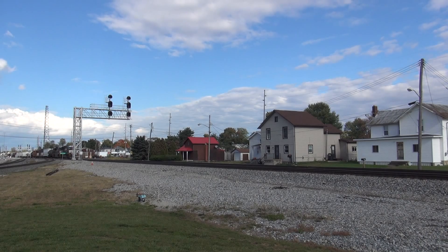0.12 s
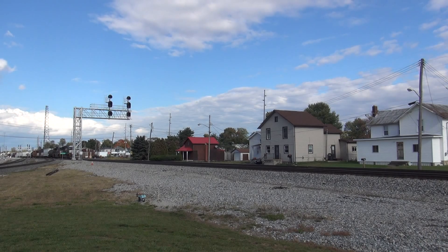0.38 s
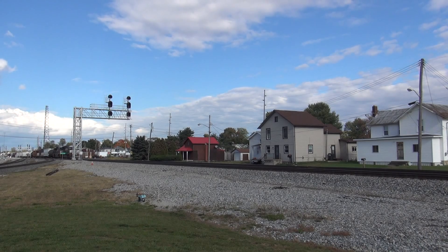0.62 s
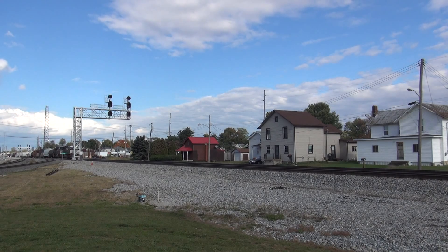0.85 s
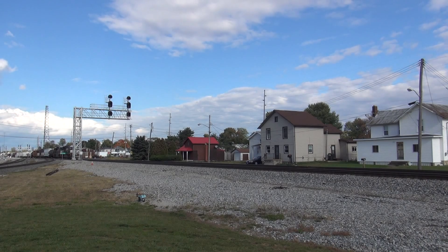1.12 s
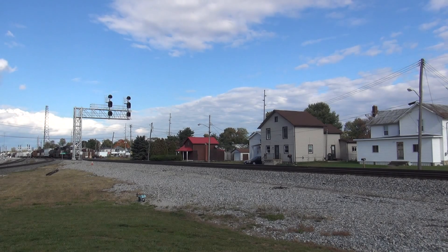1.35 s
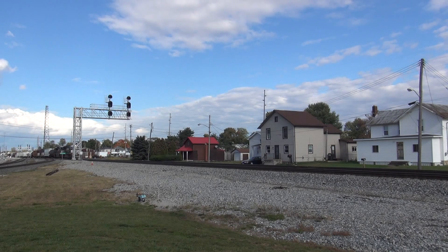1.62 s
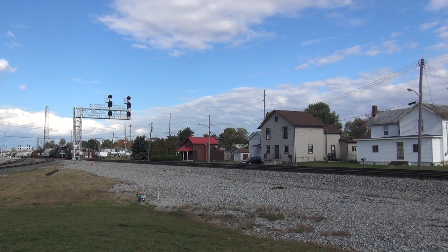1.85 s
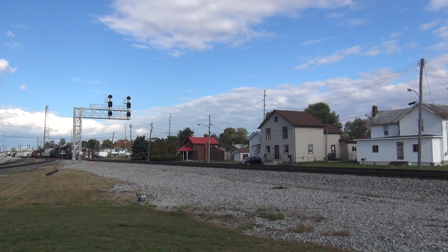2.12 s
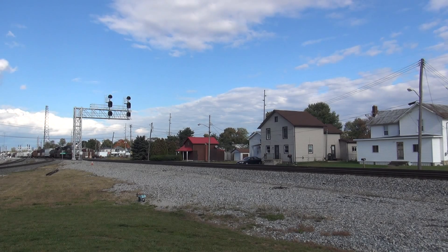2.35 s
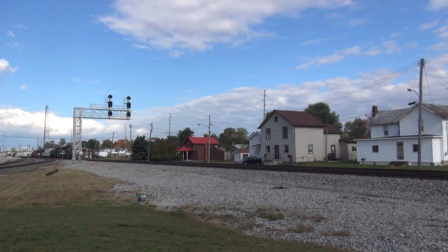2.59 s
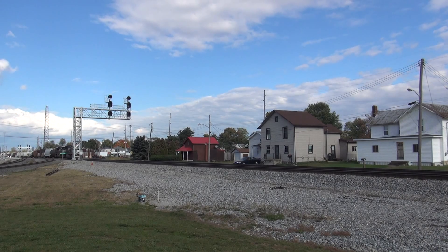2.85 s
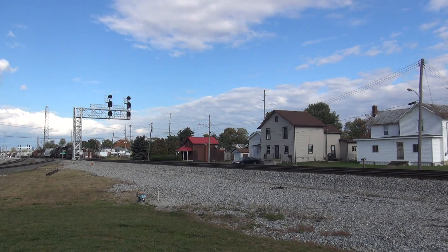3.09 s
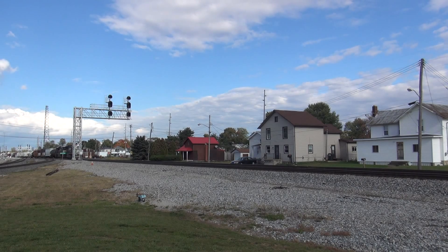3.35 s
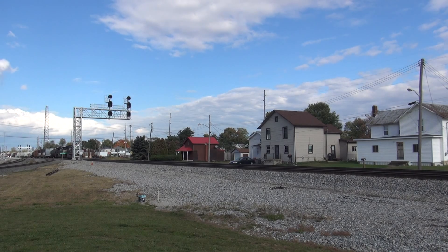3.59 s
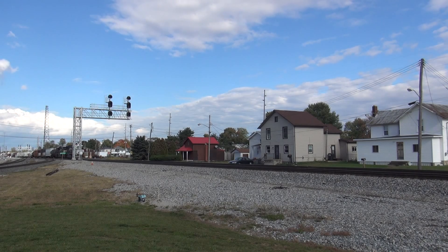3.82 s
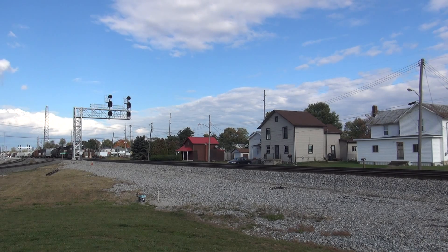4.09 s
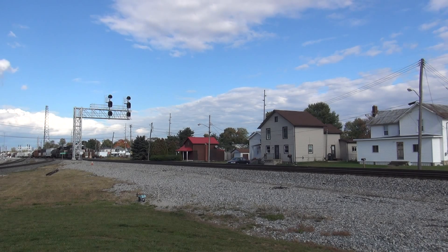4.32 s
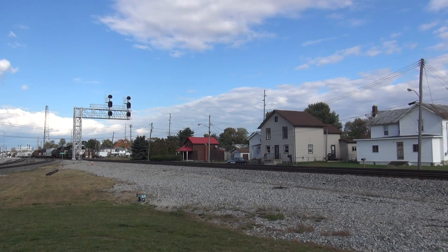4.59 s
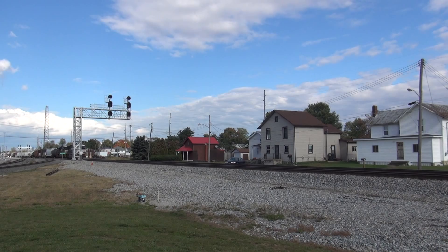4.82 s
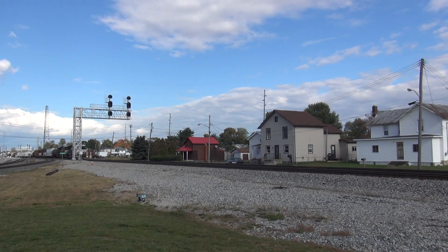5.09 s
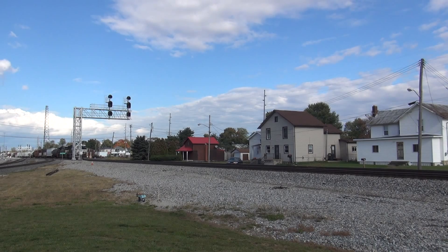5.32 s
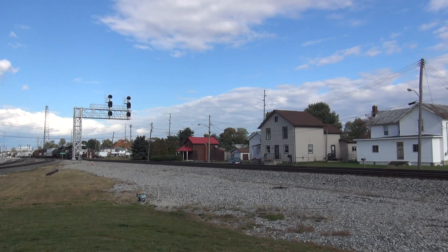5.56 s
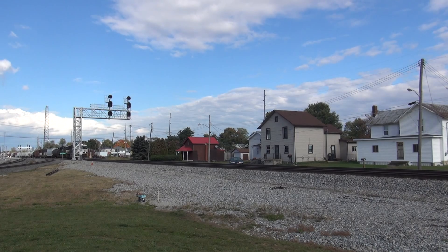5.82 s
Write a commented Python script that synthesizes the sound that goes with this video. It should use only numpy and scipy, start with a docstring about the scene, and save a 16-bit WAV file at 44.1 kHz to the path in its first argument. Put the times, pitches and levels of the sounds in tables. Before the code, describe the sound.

The end of a train horn chord echoes off houses in the first second and fades. Two diesel engines throb unevenly against each other, with a broad low roar that gets gradually louder, left of the microphone. A distant, blurred bell strikes evenly throughout. Faint insects and thin hiss lie above; small ticks, a spit of air and a dull knock come close by.

```python
"""Open ground near houses: two diesel locomotives draw near, left of the microphone, as their horn's echo dies away.
Each exhaust sums the orders of its own engine cycle, so the two throbs beat; shaped noise makes roar, thin hiss
and a flickering treble. Decaying modes make the steadily struck bell, fading chord tones the horn's echo.
Narrow noise bands make two low steady tones, close pairs of high tones and insects in the grass; close to the
microphone, bursts of coloured noise make small ticks, one spit of air and a dull knock."""
import sys
import numpy as np
from scipy import signal
from scipy.fft import rfft, irfft, next_fast_len
from scipy.io import wavfile
from scipy.ndimage import uniform_filter1d

SR = 44100
rng = np.random.default_rng(int(sys.argv[2]) if len(sys.argv) > 2 else 0)


def gain_from_decibels(decibels):
    """Convert decibel values to linear amplitude factors."""
    exponent = np.asarray(decibels, float) / 20
    return 10 ** exponent


def store_wav(level_fs):
    """Save 16-bit WAV to argv[1]."""
    pcm = np.round(np.clip(np.atleast_2d(level_fs), -1, 1) * 32767)
    wavfile.write(sys.argv[1], SR, pcm.T.astype(np.int16))


N = 261954
TIME = np.arange(N) / SR


def evened(x):
    """Scales to rms 1."""
    return x / np.sqrt(np.mean(abs(x) ** 2) + 1e-20)


def read(points, hz):
    """Reads a spectrum on a log-frequency axis."""
    f, value = np.transpose(points)
    return np.interp(np.log(hz + 1), np.log(f + 1), value)


def curve(rows, column, t=TIME):
    """Reads one column of a table against time."""
    rows = np.array(rows)
    return np.interp(t, rows[:, 0], rows[:, column])


def hump(middle_s, length_s):
    """A smooth rise and fall from 0 to 1 and back around one moment."""
    return np.exp(-(2 * (TIME - middle_s) / length_s) ** 2)


def drift(top_hz, count):
    """Random curves of rms 1, each a sum of sines up to top_hz, the slower ones stronger."""
    t = np.arange(N * 100 // SR + 2) / 100  # 100 points a second
    hz = np.geomspace(top_hz / 20, top_hz, 16)[:, None]
    waves = np.sin(2 * np.pi * (hz * t + rng.random((count, 16, 1)))) / np.sqrt(hz)
    return [np.interp(TIME, t, evened(w.sum(0))) for w in waves]


def narrow(hz, width_hz):
    """A tone smeared into a narrow band: noise through two equal poles, moved up to hz, at rms 1."""
    pole = np.exp(-np.pi * width_hz / SR)
    z = rng.standard_normal(N) + 1j * rng.standard_normal(N)
    z = signal.lfilter([1], np.poly([pole, pole]), z)
    return evened((z * np.exp(2j * np.pi * hz * TIME)).real)


def colour(x, gain):
    """Applies gain(hz) without delay; mirrored ends keep the edges free of clicks."""
    pad = 8000
    wide = np.pad(x, ((0, 0), (pad, pad)), "reflect", reflect_type="odd")
    size = next_fast_len(wide.shape[1])
    shaped = rfft(wide, size) * gain(np.fft.rfftfreq(size, 1 / SR))
    return irfft(shaped, size)[:, pad:pad + N]


def burst(start_s, length_s, db, pan_db, spectrum):
    """A short sputtering burst of coloured noise with a sharp start; positive pan_db leans left."""
    count = 4410
    t = np.arange(count) / SR
    shape = np.minimum(t / min(.15 * length_s, .002), 1) * np.exp(-(t / length_s) ** 3)
    shape *= gain_from_decibels(1.6 * evened(uniform_filter1d(rng.standard_normal(count), 200)))  # sputter
    gain = gain_from_decibels(read(spectrum, np.fft.rfftfreq(count, 1 / SR)))
    air = evened(irfft(rfft(rng.standard_normal(count)) * gain))
    out = np.zeros((2, N))
    out[:, round(start_s * SR):][:, :count] = air * shape * gain_from_decibels(db + np.array([[.5], [-.5]]) * pan_db)
    return out


# likeness of the two channels in broad noise: (frequency [Hz], correlation [-1 to 1])
LIKENESS = [(60, 1), (300, 0.99), (3000, 0.97), (6000, 0.97), (8000, 0.37), (10800, .3), (11400, 0.87),
            (22000, 1)]


def noise(spectrum, patchy_db):
    """Stereo noise of rms 1 from random short-time spectra with drifting patches."""
    frames, hz = N // 256 + 5, np.fft.rfftfreq(1024, 1 / SR)
    a, b, c, d, patches = rng.standard_normal((frames, 513, 5)).T
    patches = evened(uniform_filter1d(uniform_filter1d(patches, 12, 0), 14, 1))
    same = np.clip(read(LIKENESS, hz), -1, 1)[:, None]
    left = a + 1j * b
    right = same * left + np.sqrt(1 - same ** 2) * (c + 1j * d)
    z = np.array([left, right])
    z *= gain_from_decibels(read(spectrum, hz)[:, None] + patchy_db * patches)
    return evened(signal.istft(z, nperseg=1024, noverlap=768)[1][:, :N])


# the train's change in loudness as it nears: (time [s], gain [dB])
NEARING = [(0, -1.5), (1.2, -2), (2.4, 0.5), (3.6, 1), (5.94, 1.5)]


def nearing_db(t=TIME):
    """Gain of the approaching train; each layer that follows it takes its own share."""
    return curve(NEARING, 1, t)


def exhaust(firings, stack, cycle_hz, count, waver_db):
    """Orders of the engine cycle: uneven firings shaped by the stack; the air makes each order waver."""
    ms, db = np.transpose(firings)
    order = np.arange(3, count)
    hz = order * cycle_hz
    beat = (gain_from_decibels(db)[:, None] * np.exp(-2j * np.pi * hz * ms[:, None] / 1000)).sum(0)
    # resonances alternate in sign
    pipe = sum((-1) ** k * gain_from_decibels(g) / (1 + 2j * (hz - f) / w) for k, (f, w, g) in enumerate(stack))
    radiate = (1j * hz / 60 / (1 + 1j * hz / 60)) ** 3 / (1 + 1j * hz / 300) ** 2
    t = TIME[::10]  # low tones need few samples
    air = [gain_from_decibels(waver_db * w[::10]) for w in drift(1.433, count=12)]
    parts = np.zeros((3, len(t)))  # throb below 100 Hz, growl to 400 Hz, overtones above
    for k, f, c in zip(order, hz, beat * pipe * radiate):
        part = np.searchsorted([100, 400], f)
        parts[part] += abs(c) * np.cos(2 * np.pi * f * t + np.angle(c)) * air[k % 12]
    return signal.resample_poly(parts, 10, 1, axis=1, padtype="line")[:, :N]


# firings in one four-stroke cycle of each engine: (time after the cycle starts [ms], relative strength [dB])
LEAD_FIRINGS = [(2.05, -1.9), (10.62, -20.0), (18.05, 2.9), (28.67, -14.6), (33.26, 0.4), (42.86, -0.6),
                (48.32, 2.7), (57.28, -4.6), (61.77, -2.4), (72.56, -4.7), (81.49, -2.5), (87.64, -6.0),
                (95.4, 2.9), (102.08, 0.8), (109.02, -6.5), (117.13, -5.6)]
TRAIL_FIRINGS = [(2.32, -12.3), (13.13, -11.7), (19.72, -5.3), (29.8, -1.7), (38.89, -5.2), (52.89, -5.9),
                 (63.69, -7.8), (72.9, -4.1), (78.73, -11.0), (92.99, -0.0), (106.45, -10.4), (112.99, 0.6),
                 (126.4, -4.6), (132.97, -2.0), (140.86, -2.7), (148.09, -0.3)]
# resonances of each exhaust stack on its way over the ground: (frequency [Hz], width [Hz], gain [dB])
LEAD_STACK = [(66.7, 7.2, -31.4), (121.0, 15.0, -47.5), (170.0, 39.7, -54.5), (287.2, 12.0, -71.3),
              (467.8, 125.7, -69.5), (670.6, 12.0, -38.1), (674.9, 47.6, -44.3)]
TRAIL_STACK = [(50.7, 6.0, -31.4), (76.9, 76.1, -55.7), (144.7, 26.9, -58.7), (198.9, 115.8, -63.0)]
# each deep throb swells and sinks on its way over the ground: (time [s], lead gain [dB], trailing gain [dB])
THROB = [(0, -2, -11), (.6, 1.5, 1), (1.5, 1.5, -2), (2.9, 2.3, -2), (3.6, -1.5, 7), (4.2, -2, -1.5),
         (5.1, -0.5, -2), (5.94, 2, -2.5)]


def engines():
    """Two exhausts at different speeds; growl and still more the overtones follow the train's nearing."""
    lead = exhaust(LEAD_FIRINGS, LEAD_STACK, cycle_hz=8.2348, count=110, waver_db=.5)
    trail = exhaust(TRAIL_FIRINGS, TRAIL_STACK, cycle_hz=6.2186, count=45, waver_db=.5)
    growl_share, overtone_share = 0.88, 1.5  # of the nearing gain
    near_db = nearing_db()
    throb = lead[0] * gain_from_decibels(curve(THROB, 1)) + trail[0] * gain_from_decibels(curve(THROB, 2))
    growl = (lead[1] + trail[1]) * gain_from_decibels(growl_share * near_db)
    overtones = lead[2] * gain_from_decibels(overtone_share * near_db)  # the trailing orders end below 400 Hz
    return throb + growl + overtones


# roar of engines, fans and wheels: (frequency [Hz], relative density [dB per Hz])
ROAR = [(15, -44.5), (25, -17.5), (49, -6.5), (77, -10.5), (270, -21.5), (350, -32.5), (519, -29.5),
        (667, -23.5), (815, -26.5), (1450, -34.5), (1770, -34.5), (2520, -42.5), (2780, -39.5),
        (3080, -43.5), (7220, -59), (10000, -75.5), (13000, -109), (22000, -120)]


def roar():
    """Broad, slightly patchy noise of engines, fans and wheels, following the train's nearing in full."""
    return noise(ROAR, patchy_db=1.07) * gain_from_decibels(-37.5 + nearing_db())


# frequency of each bell mode: (frequency [Hz])
BELL_HZ = [1540, 1557, 1739, 1815, 2336, 2744, 2864, 4150]
# ring of each bell mode, in the same order: (relative level [dB], fall by 60 dB [s])
BELL_RING = [(-4, 4), (-9, 1.7), (0, 4.3), (-10, 5.2), (-11, 3.3), (-11, 15), (-7, 3.8), (-17, 7.2)]
# force of each stroke before the nearing gain: (level [dB])
FORCE_DB = [-56, -53.5, -54, -55.5, -56.5, -54, -57.5, -55.5, -52, -55.5]


def bell():
    """Even strokes ring the same modes; houses and turbulent air blur each mode on the long way."""
    first_stroke_s, stroke_gap_s = -.553, .6825
    bright_db = -3  # per octave above 1740 Hz
    rise_s = 0.0093  # echoes pile up after the direct sound
    out = np.zeros(N)
    strokes = first_stroke_s + stroke_gap_s * np.arange(len(FORCE_DB))
    blows_db = FORCE_DB + nearing_db(strokes)
    for hz, (db, t60), flutter in zip(BELL_HZ, BELL_RING, drift(10, count=len(BELL_RING))):
        mode_db = db + bright_db * np.log2(hz / 1740)
        power = np.zeros(N)
        for stroke_s, blow_db in zip(strokes, blows_db):
            t = np.maximum(TIME - stroke_s, 0)
            rise = 1 - np.exp(-t / rise_s)
            power += (rise * gain_from_decibels(blow_db + mode_db - 60 * t / t60)) ** 2
        direct = np.sqrt(2) * np.sin(2 * np.pi * (hz * TIME + rng.random()))
        blurred = evened(.7 * direct + narrow(hz, 24))
        out += np.sqrt(power) * blurred * gain_from_decibels(1.5 * flutter)
    return out


# horn partials smeared by many far walls: (frequency [Hz], level at the start [dB], fall by 60 dB [s])
HORN_TAIL = [(474, -55.5, 3.3), (538, -57.5, 3.4), (574, -53.5, 5), (638, -39.5, 0.97), (796, -58, 1.6),
             (994, -60, 1.2), (1065, -56, 2.9), (1283, -55.5, 5.1), (1970, -56.5, 1.4)]
# strong partials of the horn chord: (frequency [Hz], relative level [dB])
HORN = [(575, 0.5), (639, 0), (1131, -5.5), (1703, -17)]
# each wall's return of the end of the blast:
# (start [s], end [s], level [dB], brightness [dB per octave above the lowest partial], pitch shift [%])
WALLS = [(-.3, .088, -40, -3, .1), (.11, .283, -42, 4, 0.1), (.29, .545, -46.5, 2.5, -.5),
         (.6, .75, -53.5, 2, -1.4)]


def horn_echo():
    """The chord comes back from the houses, wall after wall; its pitch sags as each echo ends."""
    rise_s, fall_s = 0.024, 0.027
    sag_percent, sag_s = 1.97, .04
    waver_db = 2.5
    out = sum(narrow(hz, 27) * gain_from_decibels(db - 60 * TIME / t60) for hz, db, t60 in HORN_TAIL)
    for start, end, wall_db, bright_db, shift in WALLS:
        rise = np.clip((TIME - start) / rise_s, 0, 1)
        gate = rise / (1 + np.exp(np.clip((TIME - end) / fall_s * 4, -40, 40)))
        sag = sag_percent * np.exp(np.minimum(TIME - end, 0) / sag_s)
        bend = 1 + (shift - sag) / 100
        for (hz, db), waver in zip(HORN, drift(25, count=len(HORN))):
            tone = np.sqrt(2) * np.sin(2 * np.pi * (hz * np.cumsum(bend) / SR + rng.random()))
            tilt_db = bright_db * np.log2(hz / HORN[0][0])
            out += tone * gate * gain_from_decibels(wall_db + db + tilt_db + waver_db * waver)
    return out


# two low tones, then high tones in close pairs: (frequency [Hz])
TONE_HZ = [395, 436, 3945, 3996, 4615, 4673]
# strength of each tone, in the same order: (pole width [Hz], level at 1.5 s [dB], growth [dB per s])
TONES = [(5, -63, 0.4), (6, -62.5, -0.42), (30, -78, 2), (16.3, -68.5, -0.3), (30, -74, 0.13),
         (22, -72, 0.42)]


def blurred_tones():
    """Two low steady tones and two close pairs of high, slightly blurred ones, probably upper bell modes."""
    return sum(narrow(hz, width) * gain_from_decibels(db + grow_db * (TIME - 1.5))
               for hz, (width, db, grow_db) in zip(TONE_HZ, TONES))


# small ticks close by: (time [s], nominal level [dB], centre [Hz], left minus right [dB])
TICKS = [(1.785, -64, 7600, 13), (1.877, -57, 6500, 11), (1.968, -66, 13000, -3.5), (2.459, -65, 7900, 11),
         (4.7072, -61.5, 12500, 7.5), (5.087, -69, 8700, 4), (5.744, -67, 8200, 5)]


def ticks():
    """Tiny clicks close to the microphone: very short bursts, each in a band of its own."""
    edge = 2 ** (0.89 / 2)  # half of the 0.89-octave flat band
    out = np.zeros((2, N))
    for start_s, db, hz, pan_db in TICKS:
        band = [(hz / edge ** 2, -40), (hz / edge, 0), (hz * edge, 0), (hz * edge ** 2, -40)]
        out += burst(start_s, .003, db, pan_db, band)
    return out


# one spit of air close by: (nominal level [dB], left minus right [dB])
SPIT = (-53, 11.5)
# its colour: (frequency [Hz], relative density [dB per Hz])
SPIT_COLOUR = [(1500, -4), (2800, 1), (4300, 3.5), (6500, -5), (10500, -17), (11800, -8), (13000, -10),
               (15500, -18)]


def spit_of_air():
    """A brief rush of air: one sputtering noise burst, well to the left."""
    return burst(2.756, .06, *SPIT, SPIT_COLOUR)


# one dull knock: (nominal level [dB], left minus right [dB])
KNOCK = (-40, 3)
# its colour: (frequency [Hz], relative density [dB per Hz])
KNOCK_COLOUR = [(500, -25), (900, 0), (1300, -2), (2400, -17), (4500, -27), (7000, -50)]


def knock():
    """A dull knock: a short noise burst centred near 1 kHz."""
    return burst(5.226, .014, *KNOCK, KNOCK_COLOUR)


# pitch of the two choruses in the grass, lower first: (frequency [Hz], pole width [Hz])
INSECTS = [(5586, 150), (7200, 250)]
# their strength, in the same order: (level at the start [dB], growth [dB per s], waver [dB])
CHORUS = [(-74.5, 1.1, -2), (-74.5, .2, -0.8)]


def insects():
    """Two choruses, each a broad shimmering band that wavers; the lower one swells once."""
    low, high = (narrow(hz, width) * gain_from_decibels(db + grow_db * TIME + waver_db * waver)
                 for (hz, width), (db, grow_db, waver_db), waver in zip(INSECTS, CHORUS, drift(8.7, count=2)))
    return low * gain_from_decibels(5.5 * hump(5.5, .5)) + high


# thin hiss: (frequency [Hz], relative density [dB per Hz])
HISS = [(5000, -28), (7000, -6.5), (8500, -8), (10500, -10.5), (11300, -9), (12000, -22), (15700, -25.5)]
# treble band above about 11.3 kHz: (frequency [Hz], relative density [dB per Hz])
TREBLE = [(10500, -42), (11200, -26), (11500, 3), (13000, 3), (14500, 1.5), (16000, -2)]
# the treble flickers: (middle [s], length [s], gain [dB])
FLICKERS = [(2.52, .1, 6), (3.77, .12, 2), (4.214, 0.62, 5), (5.104, .1, 7), (5.502, 0.2, 7.5),
            (5.89, .06, 7.5)]


def hiss_and_treble():
    """Thin hiss, and a band above about 11.3 kHz that flickers; the hiss takes a share of each flicker."""
    near_db = nearing_db()
    flicker_db = sum(db * hump(middle_s, length_s) for middle_s, length_s, db in FLICKERS)
    hiss = noise(HISS, patchy_db=0.7) * gain_from_decibels(-79.5 + 0.52 * near_db + 0.69 * flicker_db)
    treble = noise(TREBLE, patchy_db=-2.0) * gain_from_decibels(-80 + .5 * near_db + flicker_db)
    return hiss + treble


# lean of everything but the close sounds: (frequency [Hz], left minus right [dB])
LEFTWARD = [(60, 1.27), (150, 2.5), (380, 5), (950, 4.5), (2400, 3), (6000, 4.5), (10500, -0.5), (11400, 3),
            (22000, -3)]


def scene():
    """The distant field leans left, more in the middle of the range than in the bass; close sounds are added."""
    field = engines() + roar() + bell() + horn_echo() + blurred_tones() + insects() + hiss_and_treble()
    leaning = colour(field, lambda hz: gain_from_decibels(read(LEFTWARD, hz) * np.array([[.5], [-.5]])))
    return leaning + ticks() + spit_of_air() + knock()


def band_limit(x):
    """A steep low-pass at the top of the band."""
    return signal.sosfilt(signal.butter(12, 15690, fs=SR, output="sos"), x)


def record(dry):
    """A steep low cut at 41 Hz against wind; above about 12.2 kHz both channels carry the same sound."""
    cut = colour(dry, lambda hz: 1 / np.sqrt(1 + (41 / (hz + 1)) ** 16))
    side = colour((cut - cut[::-1]) / 2, lambda hz: 1 / (1 + (hz / 12200) ** 30))
    mix = cut.mean(0) + side
    return band_limit(mix)


dry = scene()
out = record(dry)
store_wav(out)
```